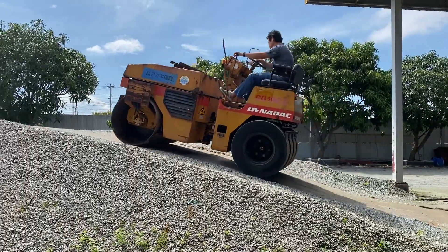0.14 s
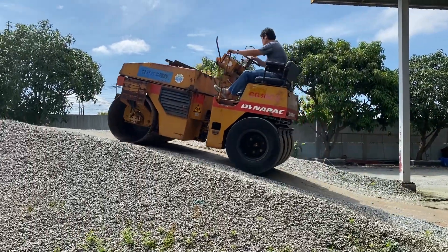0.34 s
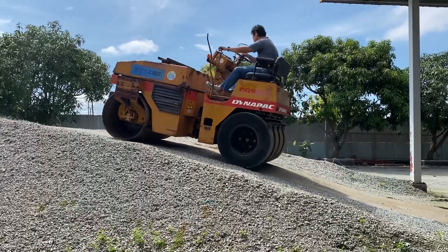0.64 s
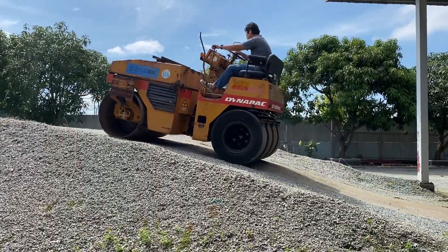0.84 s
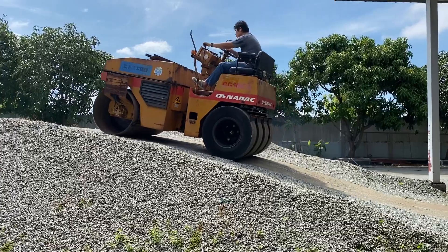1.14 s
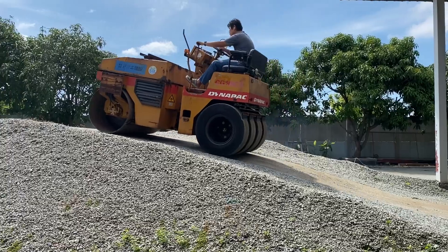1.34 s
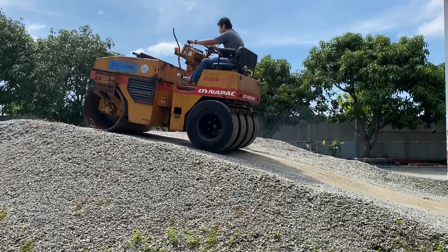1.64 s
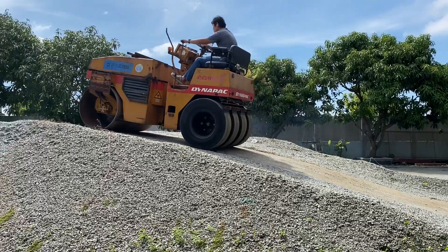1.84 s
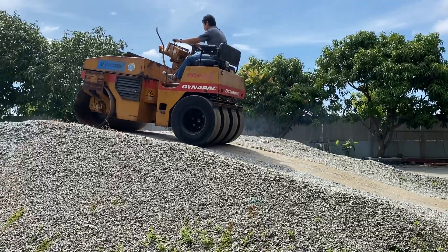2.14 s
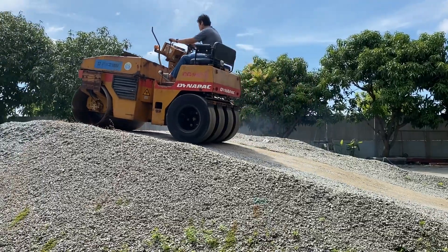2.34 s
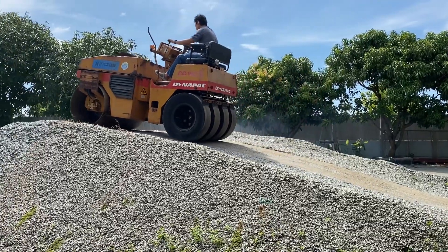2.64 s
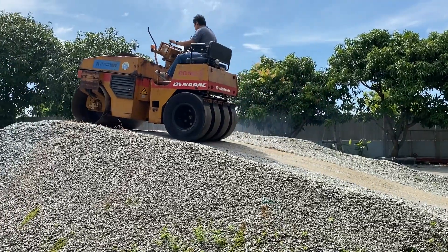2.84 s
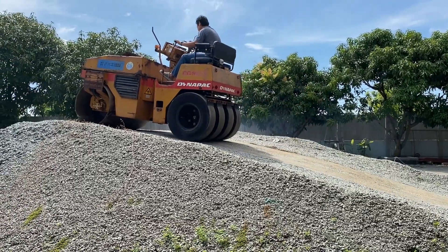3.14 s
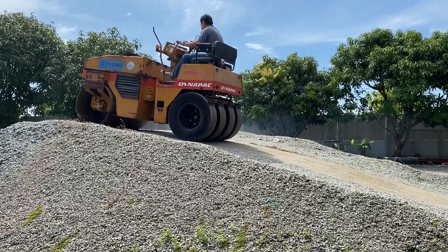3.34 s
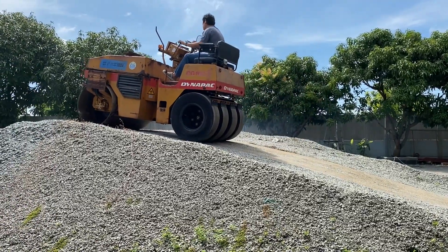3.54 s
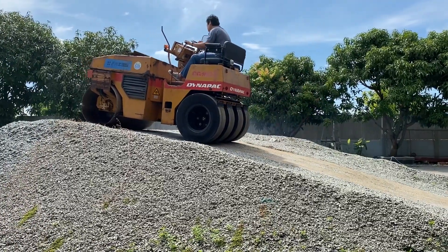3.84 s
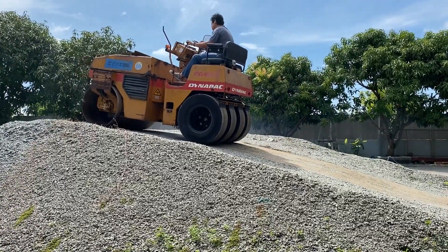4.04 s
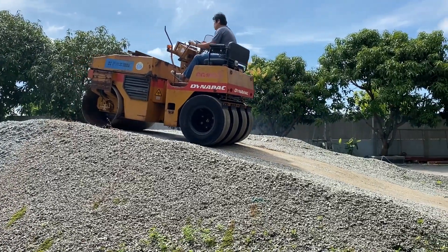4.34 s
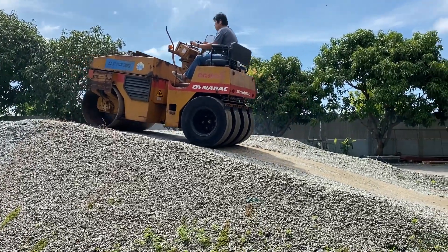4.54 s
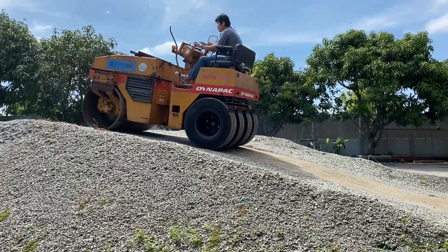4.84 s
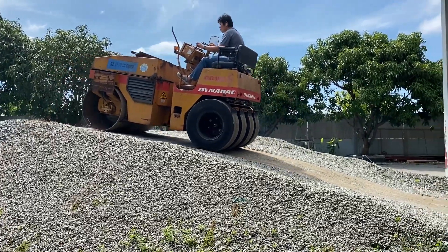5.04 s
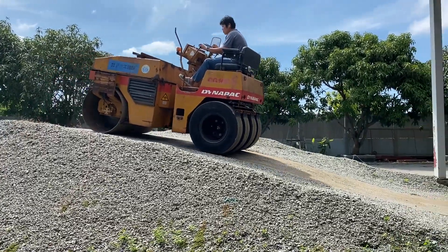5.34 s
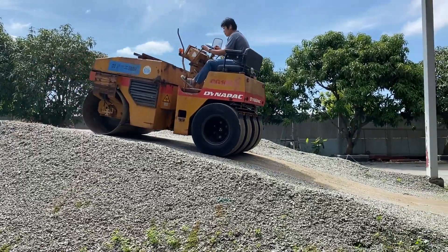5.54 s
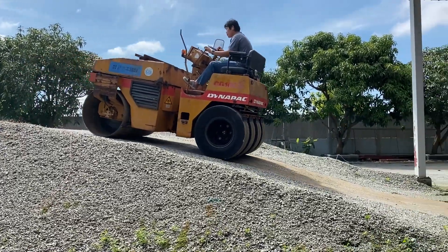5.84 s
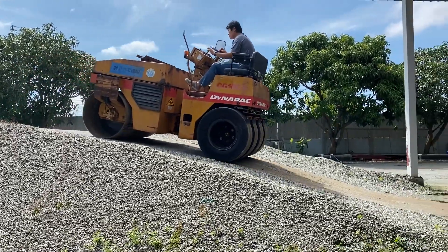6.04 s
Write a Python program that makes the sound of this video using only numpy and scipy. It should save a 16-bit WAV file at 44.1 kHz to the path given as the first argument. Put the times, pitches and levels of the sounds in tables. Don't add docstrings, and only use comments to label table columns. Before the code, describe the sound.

Labouring diesel compactor on a gravel heap: low throbbing drone, early metallic squeaks, one rise in revs, steady roar with cracking stones.

```python
import sys
import numpy as np
from scipy import signal
from scipy.fft import rfft, irfft, next_fast_len
from scipy.io import wavfile
from scipy.ndimage import uniform_filter1d, map_coordinates

SR = 44100
rng = np.random.default_rng(int(sys.argv[2]) if len(sys.argv) > 2 else 0)


def rack_gain(trim_db):
    fader = np.asarray(trim_db, float)
    return 10 ** (fader / 20)


def transcribe(u):
    v = np.clip(np.atleast_2d(u).T, -1, 1)
    q = np.round(v * 32767).astype(np.int16)
    wavfile.write(sys.argv[1], SR, q)


N = 273640

# time in seconds, level in dB.
GRAVEL_MOVING = [(0.0, -28.5), (0.1, -28.5), (0.36, -35.5), (0.71, -33), (1.19, -37), (1.33, -37.5),
                 (1.54, -40.5), (1.93, -39), (2.07, -37.5), (3.12, -42), (3.71, -38), (4.2, -39),
                 (4.83, -33), (5.2, -37), (5.72, -33.5), (6.2, -34.5)]
# frequency in Hz, level in dB per Hz.
CRUNCH_COLOUR = [(2000, -29), (3000, -1), (4000, -3.5), (4900, -0.5), (5900, -5), (6900, -2), (8000, -5.5),
                 (9500, -16)]
# frequency in Hz, level in dB per Hz.
DUST_COLOUR = [(7000, -30), (8800, -1), (11000, 0), (13000, -4), (14200, -15), (15000, -19), (16000, -17)]
# middle in seconds, half length in seconds, level in dB,
# tilt in dB from low to high modes.
SQUEALS = [
    (0.04, 0.12, -52, 5.5),
    (0.22, 0.13, -44.5, 3.5),
    (0.386, 0.042, -42, 3),
    (0.55, 0.12, -47.5, 2.5),
    (0.75, .05, -46, -1),
    (0.872, 0.042, -48, 1.5),
    (0.951, 0.026, -41, 0),
    (1.18, .05, -41, -3),
    (1.298, 0.062, -44, -2),
]
# frequency in Hz, index of the burst it follows, level in dB.
SCRAPER_MODES = [(3725, 0, -8), (4280, 0, -1), (4877, 0, -1), (5512, 1, 3.5), (6164, 2, 1), (6842, 2, -6),
                 (7537, 3, -4), (8242, 3, -9)]
# start in seconds, peak in dB, hardness in dB
STONE_SNAPS = [(0.9956, -26, -22), (1.1238, -24, -24), (1.1505, -18, -20), (1.8153, -22, -13),
               (1.945, -22, -8), (1.9759, -22, -16), (2.0517, -27, -23), (2.2159, -25.5, -5.5),
               (2.2667, -26.5, -6), (2.4563, -26, -4.5), (2.5326, -21, -14.5), (2.5935, -21.5, -10.5),
               (2.6424, -23, -9), (2.8828, -22, -15), (3.4042, -40, 1), (3.4376, -25.5, -5.5),
               (3.813, -18.5, -11), (4.1599, -26, -5.5), (4.2288, -26, -4), (4.2687, -25, -11),
               (4.3146, -15.5, -10), (4.4588, -25.5, -11), (4.7441, -20.5, -8), (4.8738, -18, -15.5),
               (4.9492, -18.5, -15), (5.2325, -30, -18), (5.3043, -25, -15), (5.5403, -16.5, -16),
               (5.7054, -17, -14.5), (6.0561, -17, -13)]
# start in seconds, end in seconds, number of stones.
RATTLES = [
    (0, .88, 26),
    (4.29, 4.35, 2),
    (5.05, 5.42, 4),
    (5.6, 6.02, 6),
]
# frequency in Hz, level in dB, 60 dB decay in seconds.
SHELL_MODES = [(6450, -2, .018), (6780, 0, .035), (7150, -7, .015)]
# frequency in Hz, level in dB, 60 dB decay in seconds.
PIN_MODES = [(10869, 0, .12), (11784, -1, .12), (13640, -5, .1), (10374, -9, .06)]
# time in seconds, turns in Hz.
DRUM_TURNS = [(0, 41.8), (.4, 41), (.8, 39.6), (1.2, 39.3), (1.6, 38.3), (1.9, 38.9), (2.1, 41.3),
              (2.5, 47.7), (2.7, 49.3), (3.1, 49.25), (3.65, 49.5), (3.9, 50.9), (4.1, 51.45),
              (4.65, 51.45), (4.9, 51.85), (5.2, 52), (6.2, 52.05)]
SHAKE_SPEEDS = (39, 41, 49, 52)
# eccentric or bounce order, then level in dB at each of those speeds.
DRUM_SHAKE = [(1, -31.5, -29, -27.5, -22.5), (2, -23.5, -23, -23.5, -25.5), (3, -27.5, -24, -32, -25.5),
              (5 / 2, -37, -35, -31.5, -25.5), (7 / 2, -47, -30, -40, -29), (4, -37, -38, -31, -38.5)]
# time in seconds, level in dB.
OIL_PRESSURE = [(1.9, -72), (2.25, -55), (2.9, -53), (3.3, -48), (3.85, -45), (4.6, -43.5), (5.1, -45),
                (5.6, -50), (6.2, -57)]
# stroke overtone, dB over the pressure, dB per Hz of drum speed over 50.
WHINE_OVERTONES = [(6, 0, 0), (9, -9, 3), (10, -14, -1), (14, -13, -2), (17, -8, -3), (5, -21, -1),
                   (11, -19, -1), (12, -16, 2), (16, -12, -2)]
# time in seconds, firings in Hz.
ENGINE_FIRING = [(0, 63.2), (0.3, 62.6), (0.6, 61.2), (0.8, 60.2), (1.02, 61.1), (1.23, 59.3), (1.5, 58.9),
                 (1.8, 59.4), (2.0, 61), (2.1, 63.1), (2.5, 77.6), (2.7, 79.8), (3, 79.7), (3.7, 78.7),
                 (4, 80.1), (4.4, 79.4), (4.8, 80), (6.2, 80.25)]
# time in seconds, level in dB.
ENGINE_EFFORT = [(0, -22), (.4, -24.5), (.9, -27), (1.25, -27), (1.6, -32), (1.9, -27), (2.3, -27.5),
                 (2.62, -26.5), (2.9, -29), (3.4, -28), (3.9, -26), (4.5, -24.5), (5.3, -25), (6.2, -23.5)]
EXHAUST_SPEEDS = (60.3, 62.5, 67, 79)
# firing order, then level in dB at each of those speeds.
EXHAUST_ORDERS = [(1, -34, -26, -19.5, -14.5), (2, -17.5, -22.5, -34, -23.5), (3, -36, -35, -34, -32),
                  (4, -26, -36, -34, -47.5), (3 / 2, -35, -42, -36, -32)]
# frequency in Hz, width in Hz, level in dB.
FRAME_MODES = [(59.9, 0.89, -2), (70.6, 1.6, -1), (110.1, 8.7, -1.5), (116.7, 2.8, 1.5), (174.4, 14, -12.5),
               (203, 28.4, -12)]
# frequency in Hz, width in Hz, level in dB.
BLOCK_MODES = [(279, 10.4, -0.5), (315.7, 19, 0), (377, 260, -4.5), (575, 43, -2.5), (682.5, 65, -3),
               (892, 26, -7.5)]
# frequency in Hz, width in Hz, level in dB.
GEAR_MODES = [(1091, 290, 0), (1254, 56, 1), (1297, 18, 3), (1373, 37, 4), (1550, 24, 0.5)]
# middle in seconds, half length in seconds, extra dB.
GEAR_BITES = [
    (1.01, 0.04, 2.5),
    (1.973, .12, 3),
    (3.62, 0.089, 3),
    (4.42, 0.11, 2.5),
]
# frequency in Hz, level in dB per Hz.
FAN_COLOUR = [(900, -48), (1600, -1), (1800, -1), (2100, 0), (2450, 0), (2600, -5), (2760, -2.5),
              (3100, -11), (4500, -23.5)]
# frequency in Hz, left-right likeness from 0 to 1.
PORT_LIKENESS = [(60, 1), (100, .998), (150, .98), (290, .85), (640, .7), (900, .4), (1350, .65),
                 (1800, .25), (3100, .55), (5000, .4), (6000, .2), (6400, .93), (8000, .99), (9000, .999),
                 (10500, .99), (12600, .999), (16000, .999)]
# frequency in Hz,
# half turns by which the right port leads.
PORT_LEAD = [(0, 0), (900, -.3), (1700, -.9), (2000, -.07), (4500, -.1), (6000, -.25), (6350, 0), (7400, 0),
             (8600, 1), (9600, 1), (10400, 2), (11700, 2), (12650, 3), (13700, 3), (14900, 4), (17000, 4)]
# frequency in Hz, left over right in dB.
PORT_BALANCE = [(60, .5), (200, .3), (380, 1), (700, 3.5), (1300, 3), (2400, 2), (4400, 2.5), (6200, 2.5),
                (6600, 0), (16000, 0)]


def unit(x):
    return x / np.sqrt(np.mean(x ** 2) + 1e-20)


def along(points, hz):
    f, v = np.transpose(points)
    return np.interp(np.log(hz + 1), np.log(f + 1), v)


def curve(rows):
    s, v = np.transpose(rows)
    return np.interp(np.arange(N) / SR, s, v)


def wobble(rate):
    coarse = np.arange(0, N + 32, 32)
    knots = rng.standard_normal(int(N * rate / SR) + 4)
    return np.interp(np.arange(N), coarse, map_coordinates(knots, [coarse * rate / SR]))


def filtered(x, response):
    m = next_fast_len(N + SR // 4)
    return irfft(rfft(x, m) * response(np.fft.rfftfreq(m, 1 / SR)), m)[..., :N]


def shape(points):
    return lambda hz: rack_gain(along(points, hz))


def modes(peaks, slope_db):
    low, high = peaks[0][0], peaks[-1][0]

    def gain(hz):
        power = sum(rack_gain(2 * db) / (1 + ((c * c - hz * hz) / (width * hz + 1e-9)) ** 2)
                    for c, width, db in peaks)
        outside = np.maximum(np.maximum(low / (hz + 1), hz / high), 1)
        return np.sqrt(power) * rack_gain(slope_db * np.log2(outside))
    return gain


def rush(gain, gate, patchy_db):
    z = signal.stft(rng.standard_normal((2, N)) * gate, nperseg=512)[2]
    field = uniform_filter1d(rng.standard_normal(z.shape[1:]), size=3, axis=0)
    field = uniform_filter1d(field, size=20, axis=1)
    pair = signal.istft(z * rack_gain(patchy_db * unit(field)), nperseg=512)[1][:, :N]
    return unit(filtered(pair, gain))


def orders(angle, multiples, levels_db, sway_db, drift, rate):
    total = np.zeros(N)
    for k, db in zip(multiples, levels_db):
        level = rack_gain(db + sway_db * wobble(rate))
        total += level * np.sin(k * angle + drift * wobble(rate) + rng.uniform(0, 2 * np.pi))
    return np.sqrt(2) * total


def ring(t, hz, db, t60, attack):
    return rack_gain(db - 60 * t / t60) * (1 - np.exp(-t / attack)) * np.sin(2 * np.pi * hz * t)


def gravel():
    moving_db, turns_hz = curve(GRAVEL_MOVING), curve(DRUM_TURNS)
    dust_db = -42.5 + 0.55 * (moving_db - moving_db.mean()) + 0.21 * (turns_hz - turns_hz.mean())
    stir = rack_gain(0.68 * wobble(24) + 2.85 * wobble(55))
    crunch = rack_gain(moving_db + 1.56) * rush(shape(CRUNCH_COLOUR), stir ** 0.59, patchy_db=2.4)
    return crunch + rack_gain(dust_db) * rush(shape(DUST_COLOUR), stir, patchy_db=2.4)


def squeal():
    t = np.arange(2 * SR) / SR
    rest_db = -59 - 200 * (t > 1.4)

    def burst_db(j):
        fade_db = 4.6 * (j == 1)
        bursts = [db + tilt * min(j, 1.5) - fade_db * s - 11 * ((t - s) / half) ** 2
                  for s, half, db, tilt in SQUEALS]
        return np.pad(np.maximum(np.max(bursts, axis=0), rest_db), (0, N - len(t)), "edge")

    bursts_db = [burst_db(j) for j in range(4)]
    levels_db = [bursts_db[j] + db for _, j, db in SCRAPER_MODES]
    one_hz_angle = 2 * np.pi * np.arange(N) / SR
    bar_hz = [row[0] for row in SCRAPER_MODES]
    return rack_gain(3) * orders(one_hz_angle, bar_hz, levels_db, sway_db=3.5, drift=.9, rate=45)


def stones():
    loose = []
    for start, end, count in RATTLES:
        for k in range(count):
            s = start + (end - start) * (k + rng.uniform(.15, .85)) / count
            loose.append((s, -26 + 2.5 * rng.standard_normal(), -25))
    return list(STONE_SNAPS) + loose


def snaps():
    rings, cracks, t = np.zeros(N + SR), np.zeros(N + SR), np.arange(SR // 9) / SR
    for s, db, hard_db in stones():
        span = slice(round(s * SR), round(s * SR) + len(t))
        shell_db = db - 21.5 - 0.78 * hard_db + 5
        pin_db = db + hard_db - 4.5
        luck, grit = rng.normal(0, 1.8, 8), rng.standard_normal(len(t))
        for (hz, level, t60), u in zip(SHELL_MODES, luck):
            rings[span] += ring(t, hz * (1 + 0.0091 * u), shell_db + level + u, t60, 0.0014)
        for (hz, level, t60), u in zip(PIN_MODES, luck[4:]):
            rings[span] += ring(t, hz, pin_db + level + u, t60, 0.00051)
        panel_hz = 4580 * (1 + 0.0035 * luck[3])
        rings[span] += ring(t, panel_hz, db - 20 * s, .05, .001)
        crumble = rack_gain(db + hard_db + 5 - 60 * t / .045) * (1 - np.exp(-t / .002))
        tick = rack_gain(db + hard_db + 7 - 60 * t / 0.0037)
        cracks[span] += (crumble + tick) * grit
    bright = shape([(2000, -30), (5000, -16), (10000, 8.0), (16000, -3)])
    return rings[:N] + filtered(cracks[:N], bright)


def drum():
    turns_hz, pressure_db = curve(DRUM_TURNS), curve(OIL_PRESSURE)
    angle = 2 * np.pi * (.13 + np.cumsum(turns_hz) / SR)
    shake_db = [np.interp(turns_hz, SHAKE_SPEEDS, row[1:]) for row in DRUM_SHAKE]
    shake = orders(angle, [row[0] for row in DRUM_SHAKE], shake_db, sway_db=2, drift=.15, rate=5)
    over_hz = np.maximum(turns_hz - 50, -1)
    whine_db = [pressure_db + db + per_hz * over_hz for _, db, per_hz in WHINE_OVERTONES]
    strokes = [round(row[0]) for row in WHINE_OVERTONES]
    return shake + orders(18 * angle, strokes, whine_db, sway_db=1.5, drift=.6, rate=25)


def engine():
    firing_hz, load_db = curve(ENGINE_FIRING), curve(ENGINE_EFFORT)
    crank, effort_db = 2 * np.pi * np.cumsum(firing_hz) / SR, load_db - load_db.mean()
    beat_db = [np.interp(firing_hz, EXHAUST_SPEEDS, row[1:]) + 0.36 * effort_db for row in EXHAUST_ORDERS]
    beat = orders(crank, [row[0] for row in EXHAUST_ORDERS], beat_db, sway_db=.7, drift=.08, rate=8)
    fired = 1 + .05 * np.cos(crank)
    boom_db = -20 + 0.9 * effort_db - 0.18 * (firing_hz - firing_hz.mean())
    boom = rack_gain(boom_db) * rush(modes(FRAME_MODES, slope_db=-5), 1, patchy_db=0.15)
    roar = rack_gain(-27.5 + effort_db) * rush(modes(BLOCK_MODES, slope_db=-1.5), fired, patchy_db=1.26)
    t = np.arange(N) / SR
    bite_db = sum(db * np.exp(-((t - s) / half) ** 2) for s, half, db in GEAR_BITES)
    knock_db = -29 + bite_db + 0.8 * effort_db
    knock = rack_gain(knock_db) * rush(modes(GEAR_MODES, slope_db=-6.5), fired, patchy_db=1.85)
    fan = rack_gain(-34.5 + 0.91 * effort_db) * rush(shape(FAN_COLOUR), fired, patchy_db=2.0)
    return beat, boom + roar + knock + fan


def scene():
    beat, noise = engine()
    direct = beat + drum() + squeal() + snaps()
    t = np.arange(SR // 8) / SR
    echoes = rng.standard_normal(len(t)) * rack_gain(-60 * t / 0.27)
    scattered = signal.fftconvolve(direct, echoes / np.linalg.norm(echoes))[:N]
    return noise + gravel() + np.array([direct, scattered])


def low_pass(x):
    return signal.sosfilt(signal.butter(12, 16750, fs=SR, output="sos"), x)


def record(dry):
    held = dry / (1 + np.abs(dry / .86) ** 6) ** (1 / 6)
    side = np.array([[-1], [1]])

    def blend(hz):
        turn = np.arccos(np.clip(along(PORT_LIKENESS, hz), -1, 1)) / 2
        return np.array([np.cos(turn), np.sin(turn)])

    def port(hz):
        lead = np.exp(.5j * np.pi * side * np.interp(hz, *np.transpose(PORT_LEAD)))
        return lead * rack_gain(-side * along(PORT_BALANCE, hz) / 2) * (hz < 15900)

    common, own = filtered(held, blend)
    return low_pass(filtered(np.array([common + own, common - own]), port))


dry = scene()
out = record(dry)
transcribe(out)
```